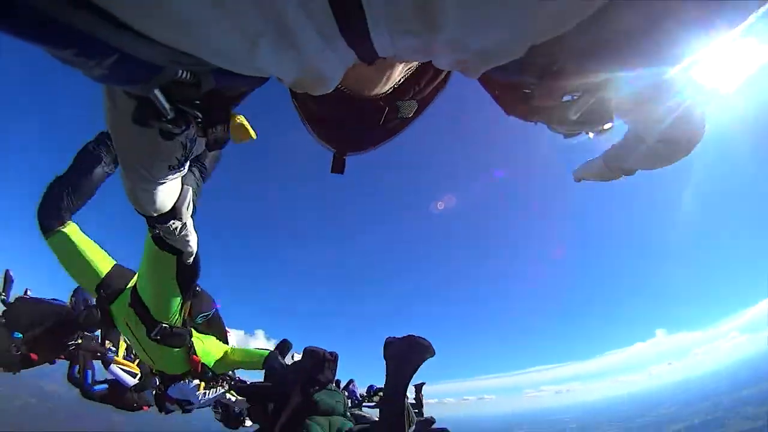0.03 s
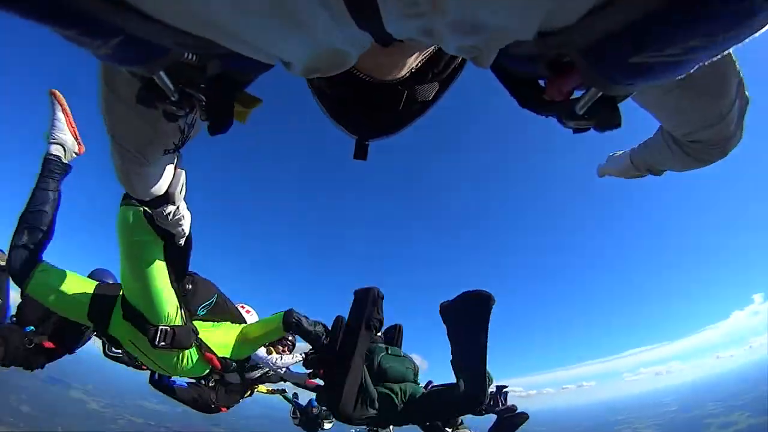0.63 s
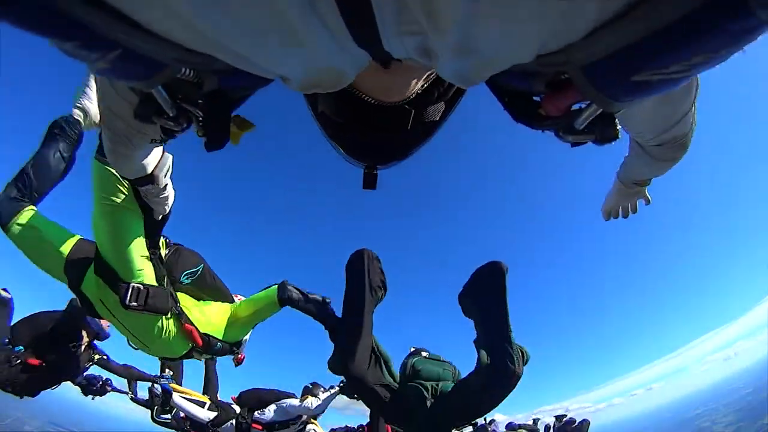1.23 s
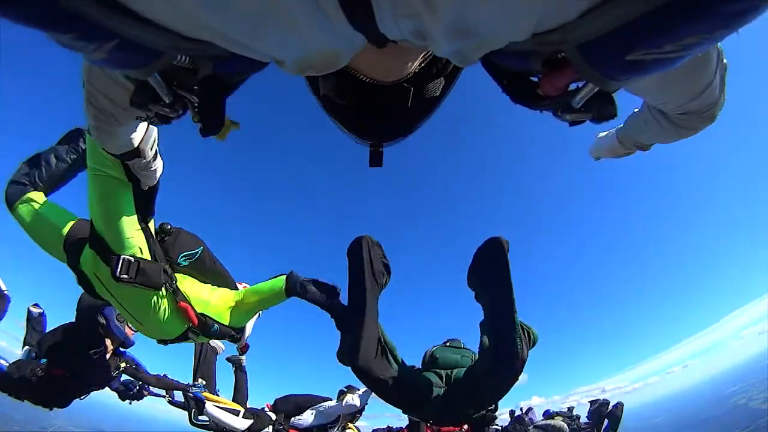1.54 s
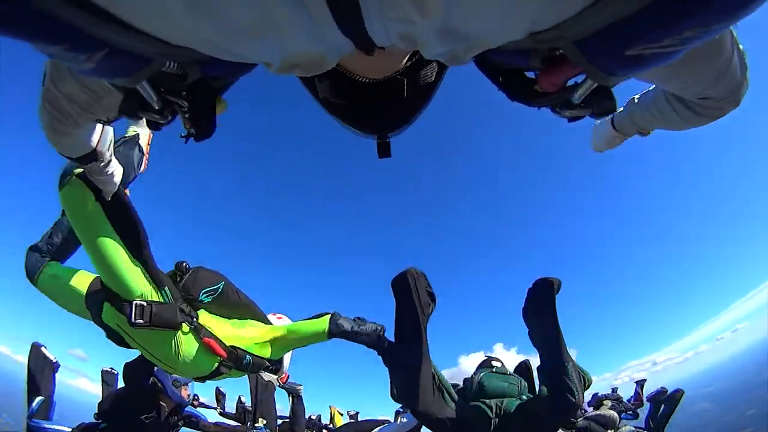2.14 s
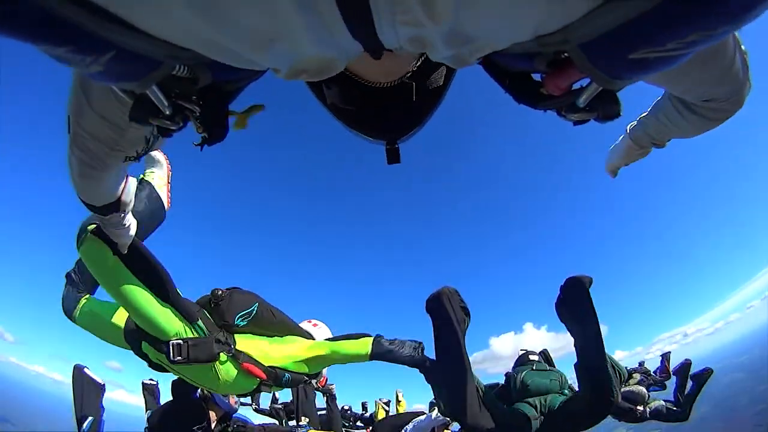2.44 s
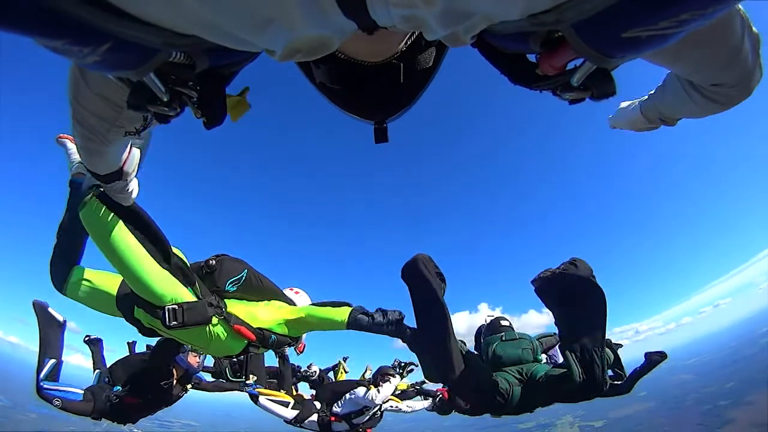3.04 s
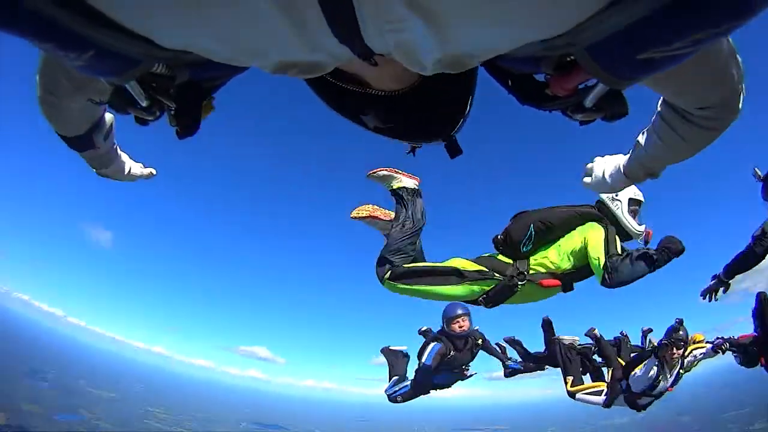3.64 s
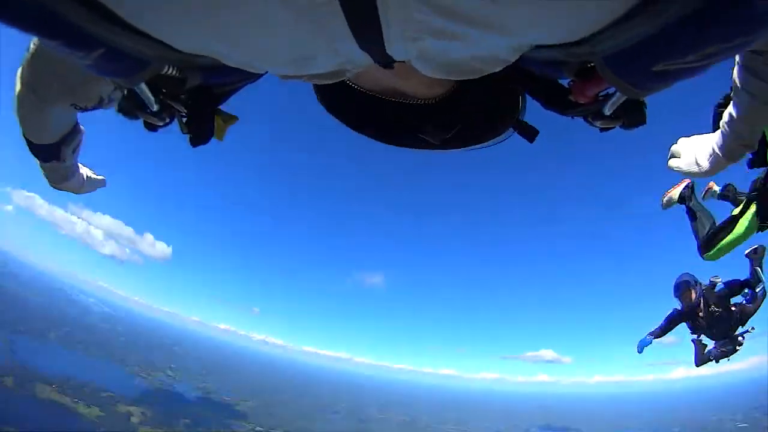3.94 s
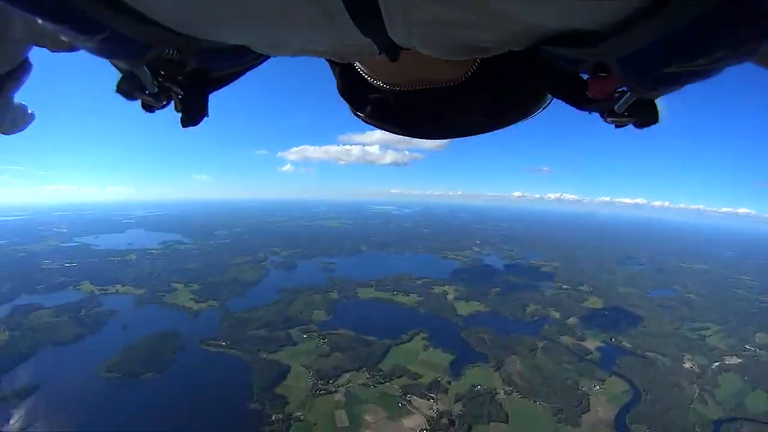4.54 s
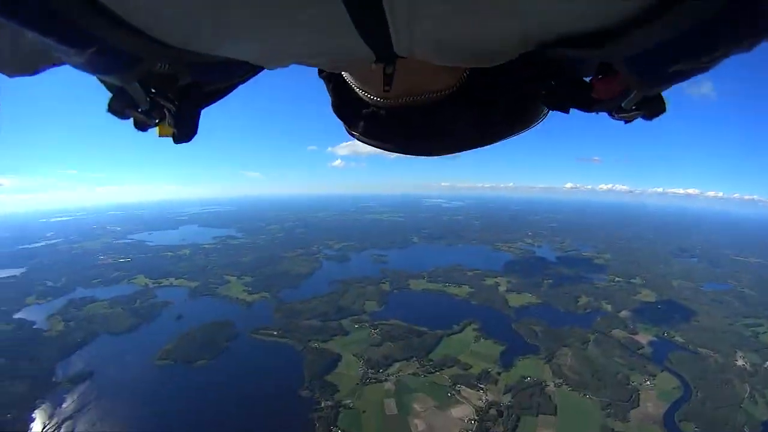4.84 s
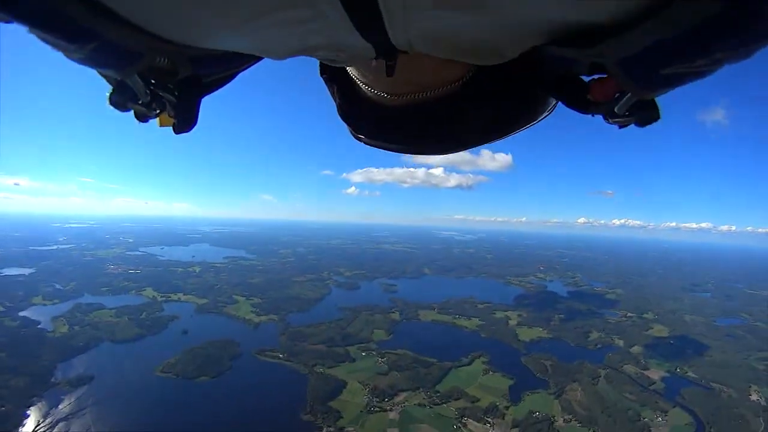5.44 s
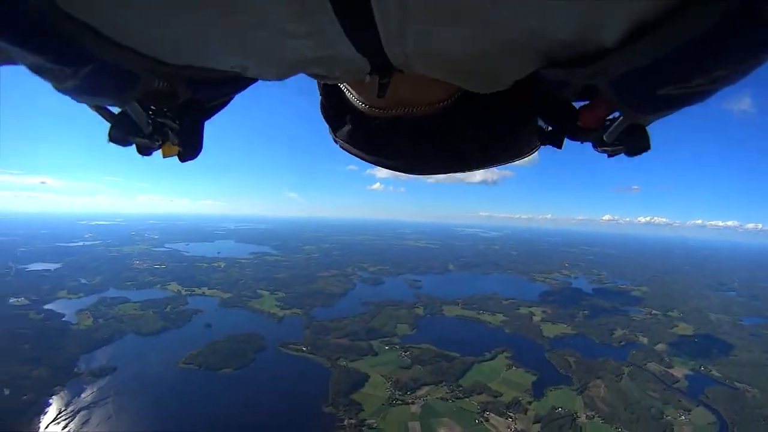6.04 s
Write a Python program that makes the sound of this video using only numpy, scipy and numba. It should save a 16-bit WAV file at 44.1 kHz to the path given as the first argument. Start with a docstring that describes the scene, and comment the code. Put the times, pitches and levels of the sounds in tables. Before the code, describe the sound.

Heavy wind roars and hisses over the microphone during a skydive, dips for a moment, then rushes back with less buffeting.

```python
"""Freefall wind at the two microphone ports of a small camera worn by a skydiver.
At first, in formation, big eddies buffet the housing, small ones swirl at each port, and the stream
rushes and hisses through the housing's resonances over a deep rumble. At about 4 s the skydiver turns
away: the ports fall into the lee of the head, and the buffeting breaks off in gulps and fades. From
about 5 s the stream is back, brighter and a little to the left. A limiter holds the peaks throughout."""
import sys
import numpy as np
from scipy import signal
from scipy.fft import rfft, irfft
from scipy.io import wavfile
from scipy.ndimage import uniform_filter1d, minimum_filter1d, map_coordinates
from numba import njit

SR = 44100
rng = np.random.default_rng(int(sys.argv[2]) if len(sys.argv) > 2 else 0)


def output_pcm(signal):
    """Save a mono or channel-first signal as 16-bit PCM at the path in sys.argv[1].

    Samples are clipped to [-1, 1] before scaling.
    """
    pcm = np.clip(np.atleast_2d(signal).T, -1, 1) * 32767
    wavfile.write(sys.argv[1], SR, np.round(pcm).astype(np.int16))


N = 277389
TIME = np.arange(N) / SR
OPPOSED = np.array([[1], [-1]])  # opposite signs at the left and right ports

# Spectra of the turbulent pressure. Each row: frequency in Hz, relative spectral density in dB.
BUFFET_SPECTRUM = [(15, -40), (25, -22), (38, -21), (69, -7.5), (129, 0), (180, 0), (255, -3), (330, -9),
                   (430, -18.5), (600, -43)]
RUSH_SPECTRUM = [(200, -8), (370, 2), (500, -1), (680, 0), (950, 0.2), (1150, 0.5), (1480, 0.5), (1780, -5),
                 (2050, -13), (2700, -40)]
SWIRL_SPECTRUM = [(60, -30), (140, -15), (236, -10), (322, 1.5), (450, 2), (650, 1), (886, -2),
                  (1430, -7.5), (2100, -16.5), (3200, -28)]
SHARED_HISS_SPECTRUM = [(1300, -9), (2100, -3.5), (2980, -1.45), (3600, -6.5), (4300, -3.5), (4850, -0.1),
                        (5300, -0.5), (5850, -6), (6630, -12.5), (7650, -12), (8950, -16), (10100, -19.5),
                        (10900, -24.5)]
OPPOSED_HISS_SPECTRUM = [(1240, -29), (2100, -3), (3460, -7), (4490, -8.5), (5400, -8.5), (5900, -13.5),
                         (9460, -21), (10800, -27)]
RUMBLE_SPECTRUM = [(18, -19), (30, -10.5), (70, -1), (100, -1.5), (170, -20)]
# How squarely the stream meets the ports.
# Each row: time in seconds, base level of the rush in dB, base level of the hiss in dB.
STREAM_LEVELS = [(0, -26, -31.5), (0.45, -23, -29.5), (0.75, -26.5, -31.5), (1.08, -26.5, -31.5),
                 (1.28, -24.3, -28.7), (2.15, -24.3, -29.5), (2.4, -27, -32.5), (2.68, -22.7, -30.8),
                 (3.1, -26, -32.5), (3.55, -26, -32.3), (3.8, -24, -30), (4.1, -27, -34), (4.9, -26, -32.7),
                 (4.99, -25.3, -29.3), (5.35, -22.5, -28), (5.6, -25.3, -30), (5.72, -23.5, -27),
                 (6.29, -23, -24.8)]
# Big eddies break off or surge. Each row: centre in seconds, length in seconds, change in dB.
BUFFET_GULPS = [(1.40, 0.26, -2.5), (4.263, 0.1, -9), (4.545, 0.15, -10.5), (4.905, .05, 3.5),
                (4.97, 0.081, -7.5), (5.595, 0.16, 5.5)]
# Quicker or slower eddies. Each row: centre in seconds, length in seconds, fractional change of rate.
EDDY_SPELLS = [(0.22, 0.71, .12), (2.802, .25, .08), (4.367, .2, -.25)]
# Strong gusts and the holes between. Each row: centre in seconds, length in seconds, change in dB.
STREAM_GUSTS = [(0.26, 0.066, -2), (0.315, .06, 2), (0.88, 0.11, 2.5), (1.375, .03, 3.5),
                (1.63, 0.054, 3.5), (1.84, 0.033, 4), (2.08, 0.052, 2), (2.47, 0.019, -3.5),
                (2.77, 0.023, 3), (2.96, 0.036, 5), (3.03, 0.035, -2.5), (3.77, 0.029, -4.5),
                (4.09, .055, 5), (5.73, .05, 2.5)]

# Exposure is the base level of the rush above its usual value; each slope is per dB of exposure.
USUAL_RUSH_DB = -25.0
USUAL_EDDY_HZ, EDDY_HZ_SLOPE = 184.0, 7.0  # passing rate of the eddies
REFERENCE_EDDY_HZ = 182.43  # the rate at which the buffet and swirl spectra hold
BUFFET_DB, BUFFET_SLOPE = -12.7, 0.02
LOW_PAN_DB, BUFFET_PAN_SLOPE = -2.8, 1.05  # left minus right; the rumble shares the fixed part
SWIRL_DB, SWIRL_SLOPE = 9.0, -0.45  # relative to the base level of the rush
FADE_FROM_S, FADE_DB_PER_S = 4.2, -3.5  # buffeting fades once clear of the formation
LEE_RUSH_DB, LEE_HISS_DB, LEE_SWIRL_DB, LEE_RUSH_POWER = -10, -5, -0.5, 1.86
SETTLED_PAN_DB, SETTLED_SWIRL_DB = 1.8, -1.3  # the new heading favours the left and calms the swirl


def buffet(level_db, speed, pan_db, crossing_s=0.00055, throb_db=0.5, opposed_db=-20.0):
    """Convection delay: big eddies pass the left port, then reach the right one a little changed."""
    left = convect(turbulence(BUFFET_SPECTRUM, throb_db * wander(rate_hz=22)), speed)
    right = np.interp(TIME - crossing_s, TIME, left)
    change = undb(opposed_db) * convect(turbulence(BUFFET_SPECTRUM), speed)
    return (np.array([left, right]) + OPPOSED * change) * pan(pan_db) * undb(level_db)


def rush(base_db, swirl_db, speed, gust_db, roar_db=2.5, tear_db=1.0, swirl_gustiness=0.75):
    """Forced resonance: the stream roars in the housing; small eddies drive the ports in antiphase."""
    bursts_db = gust_db + tear_db * wander(rate_hz=260)
    roar = undb(roar_db) * turbulence(RUSH_SPECTRUM, bursts_db)
    swirl = convect(turbulence(SWIRL_SPECTRUM), speed) * undb(swirl_gustiness * bursts_db)
    swirl = undb(swirl_db) * swirl / np.std(swirl)
    return (roar + OPPOSED * swirl) * undb(base_db)


def hiss(base_db, gust_db, shared_db=2.0, opposed_db=-2.5, gustiness=0.75):
    """Flow separation: air tearing off edges rings the port cavities near 5 kHz, in tiny spits."""
    shared_spits_db = gustiness * gust_db + 0.1 * wander(rate_hz=350)
    shared = undb(shared_db) * turbulence(SHARED_HISS_SPECTRUM, shared_spits_db)
    opposed_spits_db = gust_db + 2.2 * wander(rate_hz=270)
    opposed = undb(opposed_db) * turbulence(OPPOSED_HISS_SPECTRUM, opposed_spits_db)
    return (shared + OPPOSED * opposed) * undb(base_db)


def rumble(level_db=-28.5, opposed_db=-12.0):
    """Bluff-body turbulence: the flow round the body rumbles whichever way the head points."""
    shared = turbulence(RUMBLE_SPECTRUM)
    opposed = undb(opposed_db) * turbulence(RUMBLE_SPECTRUM)
    return (shared + OPPOSED * opposed) * undb(level_db) * pan(LOW_PAN_DB)


def gusts(flap_db=0.14, flutter_db=0.5):
    """Amplitude modulation, in dB: the unsteady air speed moves rush and hiss together."""
    flicker_db = flap_db * wander(rate_hz=70) + flutter_db * wander(rate_hz=230)
    return flicker_db + swells(STREAM_GUSTS, edge_s=0.0045)


def spells():
    """Frequency modulation: Gaussian bumps and dips scale the passing rate of the big eddies."""
    return 1 + sum(share * np.exp(-(2 * (TIME - centre_s) / length_s) ** 2)
                   for centre_s, length_s, share in EDDY_SPELLS)


def lee(turn_s=4.165, attack_s=0.033, recovery_s=0.78):
    """Wake shielding, 0 to 1: the head abruptly shelters the ports, which then swing slowly back."""
    deepest_s = turn_s + attack_s
    return np.interp(TIME, [turn_s, deepest_s, deepest_s + recovery_s], [0, 1, 0])


def turbulence(spectrum, bursts_db=0):
    """Spectral shaping: random pressure, modulated in bursts, is filtered and scaled to rms 1."""
    hz, db = np.transpose(spectrum)
    bins_hz = np.maximum(np.fft.rfftfreq(N, 1 / SR), 1)
    gain = undb(np.interp(np.log(bins_hz), np.log(hz), db, left=-np.inf, right=-np.inf))
    bursts = rng.standard_normal(N) * undb(bursts_db)
    pressure = irfft(rfft(bursts) * gain, N)
    return pressure / np.std(pressure)


def convect(pressure, speed):
    """Frozen turbulence: a fixed pattern passes at a relative speed, so slower flow sounds deeper."""
    return map_coordinates(pressure, [np.cumsum(speed)], order=1, mode="wrap")


def wander(rate_hz):
    """Spline interpolation: a smooth curve of unit spread through `rate_hz` random values a second."""
    values = rng.standard_normal(N // 8)
    curve = map_coordinates(values, [TIME * rate_hz], order=2, mode="wrap")
    return curve / np.std(curve)


def swells(table, edge_s):
    """Soft gating, in dB: each event shifts the level, holds it for its length and lets it return."""
    return sum(db * (step(centre_s - length_s / 2, edge_s) - step(centre_s + length_s / 2, edge_s))
               for centre_s, length_s, db in table)


def step(at_s, edge_s):
    """Logistic transition: a soft rise from 0 to 1."""
    return 0.5 + 0.5 * np.tanh((TIME - at_s) / (2 * edge_s))


def curves(table):
    """Linear interpolation: each column after the first becomes a curve in time."""
    times_s, *columns = np.transpose(table)
    return [np.interp(TIME, times_s, column) for column in columns]


def pan(db):
    """Level-difference panning: two gains that set the left `db` above the right."""
    return undb(OPPOSED * db / 2)


def undb(db):
    """The decibel law: 20 dB is a factor of ten in amplitude."""
    return 10 ** (np.asarray(db) / 20)


def limiter(x, threshold_db=-6.0, port_weight=0.74, ahead_s=0.0038, release_s=0.026):
    """Look-ahead limiting: the gain falls just before a peak, so loud eddies briefly duck the hiss."""
    peaks = np.maximum(abs(x.mean(axis=0)), port_weight * abs(x).max(axis=0))
    held = peak_envelope(peaks, np.exp(-1 / (release_s * SR)))
    gain = 1 / np.maximum(held / undb(threshold_db), 1)
    window = int(ahead_s * SR) + 1
    return x * uniform_filter1d(minimum_filter1d(gain, window), window)


@njit
def peak_envelope(peaks, decay):
    """Peak detection: the envelope rises at once and decays exponentially."""
    envelope, held = np.empty(len(peaks)), 0.
    for i in range(len(peaks)):
        held = max(peaks[i], held * decay)
        envelope[i] = held
    return envelope


def scene():
    """Superposition of buffet, stream and rumble: the squarer the wind, the quicker its eddies."""
    rush_db, hiss_db = curves(STREAM_LEVELS)
    exposure_db = rush_db - USUAL_RUSH_DB
    shelter = lee()
    settled = step(at_s=4.93, edge_s=0.04)  # 1 on the new heading
    eddy_hz = USUAL_EDDY_HZ + EDDY_HZ_SLOPE * exposure_db * (1 - settled / 2)
    speed = eddy_hz / REFERENCE_EDDY_HZ

    fade_db = FADE_DB_PER_S * np.maximum(TIME - FADE_FROM_S, 0)
    buffet_db = BUFFET_DB + BUFFET_SLOPE * exposure_db + fade_db + swells(BUFFET_GULPS, edge_s=0.006)
    eddies = buffet(buffet_db, speed * spells(), LOW_PAN_DB + BUFFET_PAN_SLOPE * exposure_db)

    gust_db = gusts()
    swirl_db = SWIRL_DB + SWIRL_SLOPE * exposure_db + LEE_SWIRL_DB * shelter + SETTLED_SWIRL_DB * settled
    stream = rush(rush_db + LEE_RUSH_DB * shelter ** LEE_RUSH_POWER, swirl_db, speed, gust_db)
    stream += hiss(hiss_db + LEE_HISS_DB * shelter, gust_db)
    return (eddies + stream + rumble()) * pan(SETTLED_PAN_DB * settled)


def record(dry, cutoff_hz=10950):
    """Peak and band limiting: the camera holds the wind down, then cuts the top treble steeply."""
    lowpass = signal.ellip(12, 0.1, 85, cutoff_hz, fs=SR, output="sos")
    return signal.sosfilt(lowpass, limiter(dry))


dry = scene()
out = record(dry)
output_pcm(out)
```